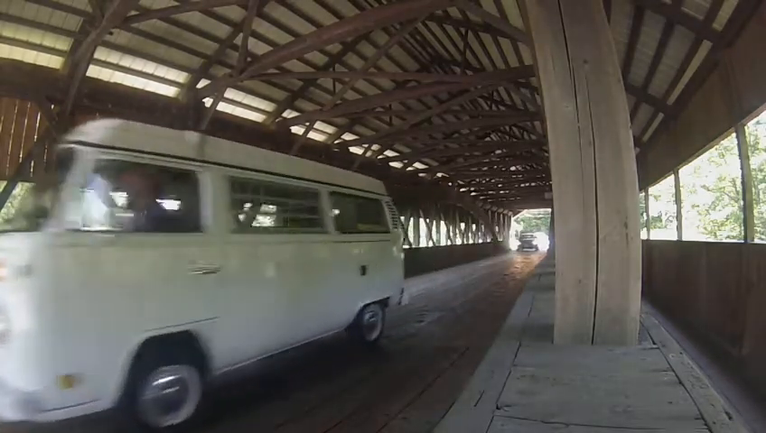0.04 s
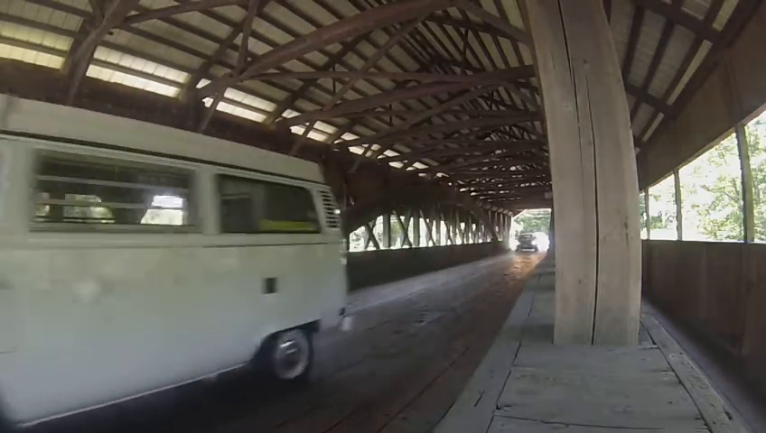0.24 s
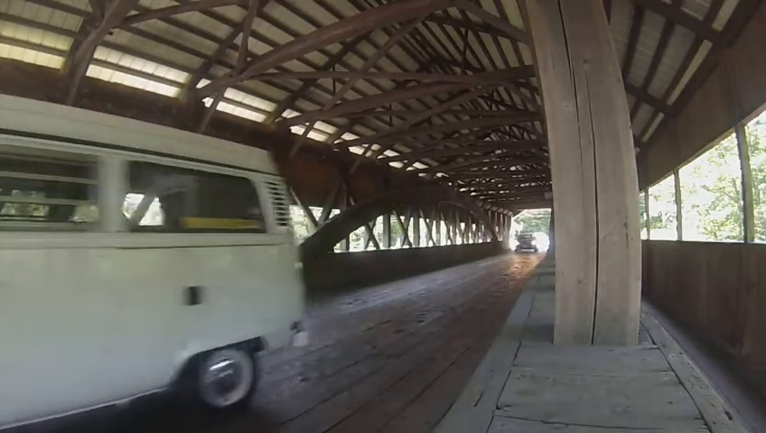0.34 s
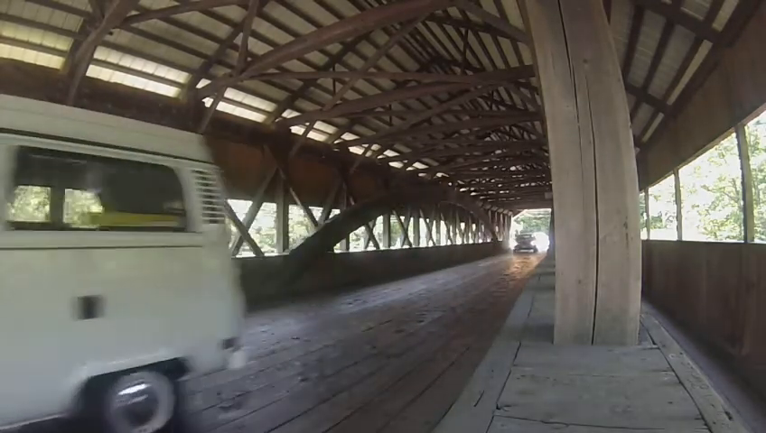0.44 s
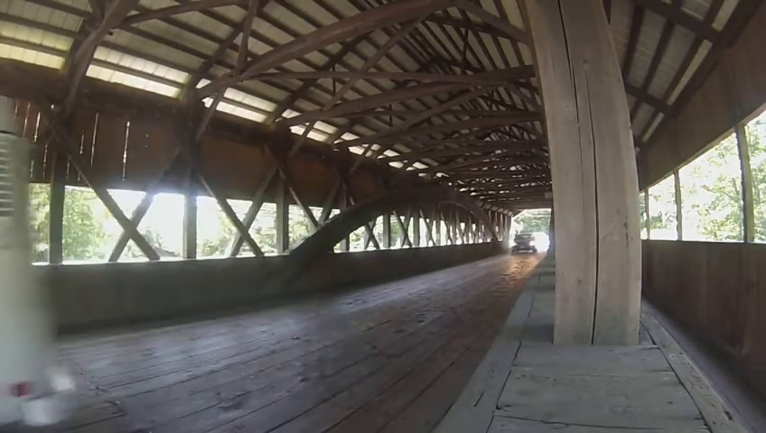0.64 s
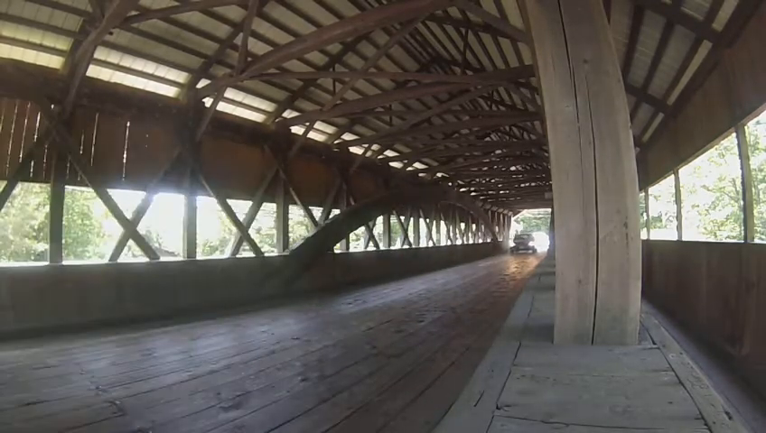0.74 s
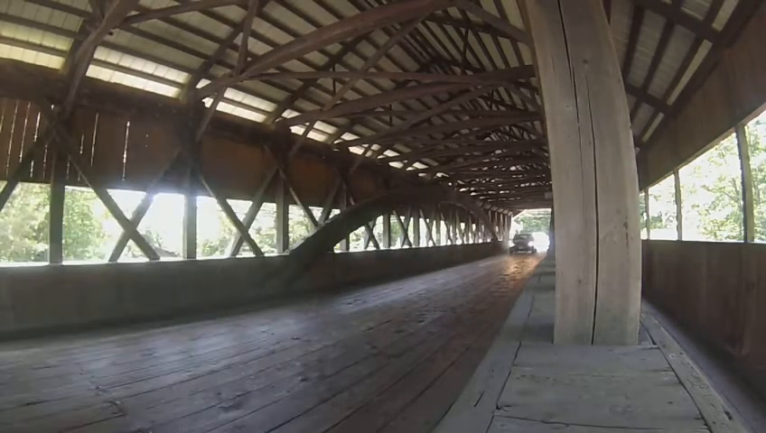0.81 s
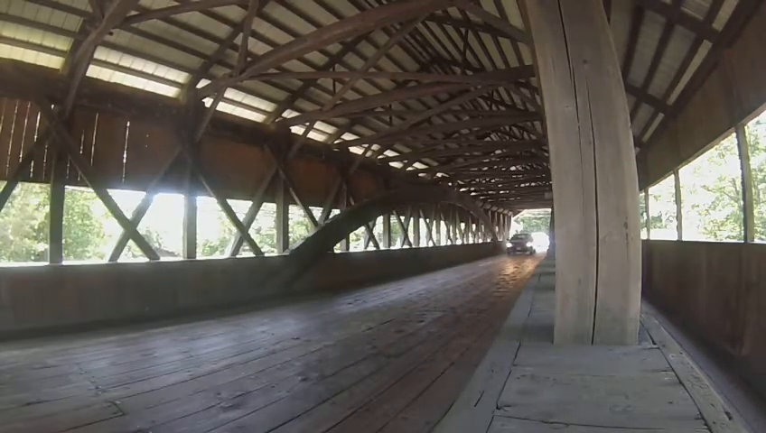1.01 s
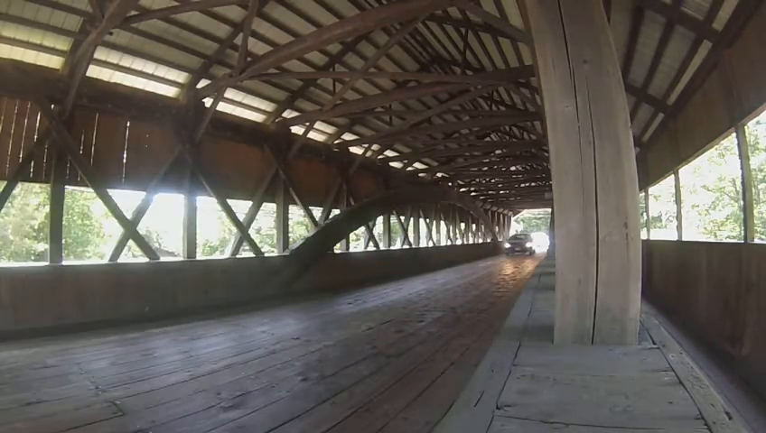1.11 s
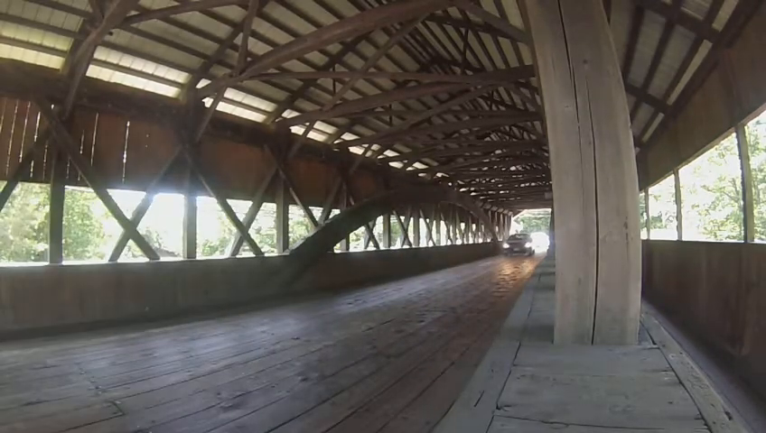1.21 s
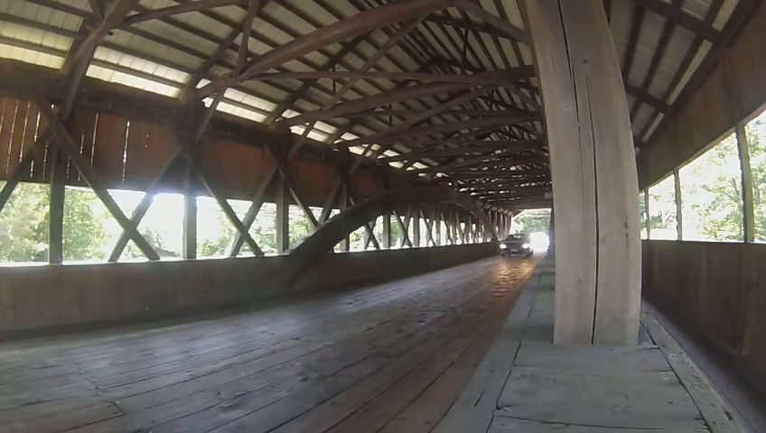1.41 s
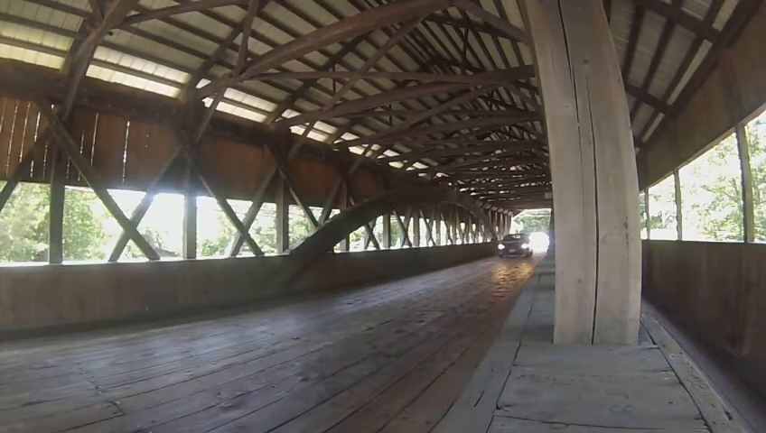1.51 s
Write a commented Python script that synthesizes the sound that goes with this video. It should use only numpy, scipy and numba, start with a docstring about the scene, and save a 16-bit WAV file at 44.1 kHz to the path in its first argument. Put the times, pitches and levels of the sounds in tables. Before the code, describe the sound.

A van rolls close by over the plank deck of a covered wooden bridge, its low drone and rumble building from the start. At about 0.5 seconds a wheel hits a loose plank with a low thump and a quick rattle of dry clacks. A second follows at about 0.9 seconds, the drone deepening with each. After 1.1 seconds the rumble eases, with a faint steady hiss throughout.

```python
"""A van on a covered wooden bridge

Heard from the walkway, rolling tyres force the plank deck into a drone and a rumble. Each of two axles
jolts the span and tips a loose plank, which rebounds with thuds and dry clacks while the drone deepens.
Tread noise swells and fades with distance, and a steady hiss ducks under automatic gain control."""
import sys
import numpy as np
from scipy import signal
from scipy.fft import rfft, irfft
from scipy.io import wavfile
from scipy.ndimage import uniform_filter1d
from numba import njit

SR = 44100
rng = np.random.default_rng(int(sys.argv[2]) if len(sys.argv) > 2 else 0)


def wrap_up_sound(samples):
    """Save the sound to the file named by the first command line argument, as 16-bit audio."""
    columns = np.atleast_2d(samples).T
    # keep every value between -1 and 1, then stretch to whole-number steps
    tamed = np.clip(columns, -1, 1)
    steps = np.round(tamed * 32767).astype(np.int16)
    wavfile.write(sys.argv[1], SR, steps)


N = 68355

# Impacts of the loose plank. Each row: start in seconds, thud in dB, clack in dB, contact cutoff in Hz.
PLANK_KNOCKS = [(0.4829, -34.5, 0, 1550), (0.4876, -8.5, -24, 2520), (0.4917, -36, -2.5, 5120),
                (0.495, -23, -21.5, 8000), (0.5051, -6.5, -4, 9000), (0.5100, 2.5, -25, 2980),
                (0.5182, -12.5, -3, 3020), (0.5369, -2.5, -2.5, 3220), (0.5537, -23, -34, 2030),
                (0.8468, -7, -3, 1600), (0.8557, -6, -4.5, 3900), (0.8596, -49, -10, 8100),
                (0.868, -12.5, -5.5, 4900), (0.8740, 2, -19.5, 3000), (0.8820, -46, -3.5, 2980),
                (0.9006, -9.5, -5.5, 3040), (0.9150, -6.5, -19, 2480), (0.9367, -33.5, -22, 3950),
                (0.942, -19.5, -18.5, 3080), (0.9563, -13, -40, 1500), (0.9613, -46, -20, 2470),
                (0.984, -31, -32, 1520)]
# Axles reaching the plank. Each row: start in seconds, jolt of the span in dB, tyre slap in dB.
AXLE_ARRIVALS = [(0.4840, -7.5, -10), (0.8470, -5.5, -4)]

# Modes of vibration. Each row: frequency in Hz, relative level in dB, 60 dB decay time in seconds.
PLANK_LOW_MODES = [(142.2, -20, 0.9), (189.4, -6, .15), (207.7, -6.5, 0.14), (272, -26.5, 0.14),
                   (297, -33.5, 0.32), (346, -34, 0.1), (417, -35.5, 0.21), (464.7, -23.5, 0.22),
                   (514, -33.5, .13), (526, -34.5, 0.059), (642, -32, 0.13)]
CLACK_RING_MODES = [(1204, -26, 0.084), (1377, -41, 0.17), (1562, -32, .18), (1726, -27.5, 0.085),
                    (1920, -35, 0.072), (2010, -32, .14), (2200, -49, 0.18), (4170, -47, .1)]  # the brief, high, rattling ring after each knock
CONTACT_MODES = [(1480, -9, .011), (1900, -10, .01), (2170, -3, .011)]  # heavily damped: a dry crack
TYRE_SLAP_MODES = [(280.6, 3, 0.081), (339.5, -7, 0.11)]

# The deck's response to the tyres. Each row: time in seconds, deep drone frequency in Hz,
# deep drone level in dB, upper drone level in dB, rumble level in dB.
DECK_RESPONSE = [(0, 78.1, -50.5, -28.5, -34.5), (0.121, 84.45, -31, -39.5, -38),
                 (0.241, 86.8, -29.5, -27.5, -27.5), (0.281, 86.1, -22, -29.5, -28.5),
                 (.36, 85.6, -17, -33.5, -23.5), (.40, 81.2, -32, -22.5, -31.5),
                 (.47, 70.5, -32.5, -28.5, -25), (.52, 68.5, -14, -11, -18),
                 (0.621, 67.96, -23, -29.5, -24), (0.758, 80, -25.5, -26.5, -30),
                 (.83, 74.63, -36.5, -31, -31.5), (0.892, 68.4, -14, -10.5, -32),
                 (.96, 67.2, -18, -17.5, -18.5), (1.05, 76.34, -21.5, -27.5, -28),
                 (1.148, 83.8, -24.5, -38, -45.5), (1.222, 86.75, -33, -39.5, -40.5),
                 (1.44, 87.5, -31, -35.5, -38), (1.55, 88, -34.5, -37, -39.5)]
# Course of a thin, high sizzle. Each row: time in seconds, level in dB.
SIZZLE_ENVELOPE = [(0, -63.5), (.55, -63.5), (.68, -61.5), (1.051, -60), (1.2, -65.5), (1.55, -63)]

# Spectra of the noises. Each row: frequency in Hz, relative level in dB.
RATTLE_SPECTRUM = [(300, 7.5), (600, 1), (950, -8), (1300, 5.5), (2200, 5), (2500, -5), (2800, -14),
                   (4000, -11.5), (4400, -20.5), (6000, -22), (8000, -49.5), (15000, -67)]
TIMBER_SPECTRUM = [(50, -60.5), (100, 4.5), (140, -22), (230, 0.5), (320, -5.5), (450, -14.5), (700, -28),
                   (1100, -39.5), (4000, -79)]
RUMBLE_SPECTRUM = [(20, -38.5), (34, -14.5), (45, -9), (68, 4), (90, -29), (115, 4.5), (143, -1.5),
                   (190, 4), (230, -6), (268, 0), (295, -8), (330, -8), (385, -28), (425, -27.5),
                   (455, -11.5), (490, -25), (700, -36), (1500, -30), (4000, -74.5)]
TREAD_SPECTRUM = [(300, -6), (700, 14.5), (1500, 2.5), (2000, -8), (3500, -2.5), (7000, -7), (9500, -22),
                  (13000, -20.5), (16000, -40)]
AIR_SPECTRUM = [(25, 20.5), (200, 8), (400, -0.5), (750, -2), (1050, -4.5), (1400, 6.5), (1650, 4),
                (1950, -7), (2480, 1.5), (2850, -14), (3800, -9.5), (5000, -16.5), (6500, -18.5),
                (8000, -20.5), (9300, -28), (12000, -27.5), (14500, -42), (16000, -25.5)]
SIZZLE_SPECTRUM = [(3000, -33.5), (5900, -1.5), (6450, 2.5), (6950, -30.5), (7500, -11.5), (8050, -7.5),
                   (8700, -26), (15000, -54.5)]

TIME = np.arange(N) / SR


def loose_plank():
    """Impact excitation: plank and timber thud; the clack that follows is brighter for a sharp contact."""
    starts, thud_db = np.array(PLANK_KNOCKS).T[:2]
    thud = soft_contact(ring(PLANK_LOW_MODES) * rise(0.00067), cutoff_hz=820)
    thuds = strike(starts, thud_db, thud)
    timber_energy = strike(starts, 2 * thud_db, decay(t60=0.19) ** 2)  # diffuse sound adds in energy
    timber = undb(-15) * colour(noise() * np.sqrt(timber_energy), TIMBER_SPECTRUM)
    clack = soft_contact(ring(CONTACT_MODES + CLACK_RING_MODES) * rise(0.00097), cutoff_hz=2220)
    rattle = undb(-17) * colour(noise(), RATTLE_SPECTRUM)
    burst = rise(0.0005) * decay(t60=0.075)
    clacks = np.zeros(N)
    for start, _, db, contact_hz in PLANK_KNOCKS:
        impact = strike([start], [db], clack) + rattle * strike([start], [db], burst)
        clacks += soft_contact(impact, contact_hz)
    return radiate(thuds + timber + clacks)


def axle_jolts():
    """Transient response: each axle jolts a low mode of the span as its tyre slaps the plank's edge."""
    starts, jolt_db, slap_db = np.array(AXLE_ARRIVALS).T
    span_hz, span_t60 = 84, 0.073
    jolts = strike(starts, jolt_db, ring([(span_hz, 0, span_t60)]))
    slaps = strike(starts, slap_db, ring(TYRE_SLAP_MODES) * rise(0.011))
    return radiate(soft_contact(jolts + slaps, cutoff_hz=583))


def deck():
    """Forced vibration: tyres drive two drones and a rumble; the deep drone sags as the axles pass."""
    times, *columns = np.array(DECK_RESPONSE).T
    deep_hz, deep_db, upper_db, rumble_db = (np.interp(TIME, times, column) for column in columns)
    deep = undb(deep_db) * drone(deep_hz, drift_rate_hz=6.8, waver_rate_hz=25.32)
    upper = undb(upper_db) * drone(159.74, drift_rate_hz=25.42, waver_rate_hz=33.89)
    return deep + upper + undb(rumble_db) * colour(noise(), RUMBLE_SPECTRUM)


def drone(hz, drift_rate_hz, waver_rate_hz):
    """Driven resonance: a deck mode kept sounding by the tyres, unsteady in pitch and strength."""
    drift_share, waver_db = 0.0205, 1.1
    cycles = np.cumsum(hz * (1 + drift_share * wander(drift_rate_hz))) / SR
    return np.sqrt(2) * np.sin(2 * np.pi * cycles) * undb(waver_db * wander(waver_rate_hz))


def tread_hiss():
    """Spherical spreading: the pressure of the tyre hiss falls inversely with the van's distance."""
    speed_m_s, nearest_s, nearest_m = 6.8, 0.47, 2.3
    distance_m = np.hypot(speed_m_s * (TIME - nearest_s), nearest_m)
    return undb(-50) * nearest_m / distance_m * colour(noise(), TREAD_SPECTRUM)


def air():
    """Ambient noise: open air and far tyres hiss steadily; a thin sizzle comes up behind the van."""
    sizzle_db = np.interp(TIME, *np.array(SIZZLE_ENVELOPE).T) + 2.7 * wander(rate_hz=30)
    hiss = undb(-42) * colour(noise(), AIR_SPECTRUM)
    return hiss + undb(sizzle_db) * colour(noise(), SIZZLE_SPECTRUM)


def ring(modes):
    """Free vibration: a struck body sounds as a sum of damped sines."""
    return sum(undb(db) * decay(t60) * np.sin(2 * np.pi * hz * TIME) for hz, db, t60 in modes)


def strike(starts, levels_db, response):
    """Superposition: each blow adds a delayed, scaled copy of the response."""
    out = np.zeros(N)
    for start, db in zip(starts, levels_db):
        i = int(start * SR)
        out[i:] += undb(db) * response[:N - i]
    return out


def soft_contact(x, cutoff_hz):
    """Contact compliance: a soft blow carries little treble."""
    return signal.sosfilt(signal.butter(4, cutoff_hz, fs=SR, output="sos"), x)


def radiate(x, cutoff_hz=52):
    """Radiation efficiency: the boards give off little of their lowest bass."""
    return signal.sosfilt(signal.butter(6, cutoff_hz, "high", fs=SR, output="sos"), x)


def colour(x, spectrum):
    """Minimum-phase filtering: shapes the spectrum, while white noise keeps its power."""
    size = 2 * N
    hz, db = np.array(spectrum).T
    bin_hz = np.maximum(np.arange(N + 1) * SR / size, 1)
    gain = undb(np.interp(np.log(bin_hz), np.log(hz), db))
    cepstrum = irfft(np.log(gain / np.sqrt(np.mean(gain ** 2))))
    cepstrum[1:N] *= 2  # folding onto positive time makes the filter causal
    cepstrum[N + 1:] = 0
    return irfft(rfft(x, size) * np.exp(rfft(cepstrum)))[:N]


def noise():
    """Gaussian white noise of unit variance."""
    return rng.standard_normal(N)


def wander(rate_hz):
    """Smooth random modulation of unit variance."""
    hold = int(SR / rate_hz)
    steps = np.repeat(rng.standard_normal(200), hold)[:N]
    smooth = uniform_filter1d(uniform_filter1d(steps, hold), hold)
    return (smooth - smooth.mean()) / smooth.std()


def rise(seconds):
    """Exponential attack with the given time constant."""
    return 1 - np.exp(-TIME / seconds)


def decay(t60):
    """Exponential damping by 60 dB in t60 seconds."""
    return np.exp(-np.minimum(np.log(1000) * TIME / t60, 60))


def undb(db):
    """Decibels to amplitude ratio."""
    return 10 ** (np.asarray(db) / 20)


def scene():
    """Superposition: the pressures of bridge, tyres and air add in one channel."""
    return (deck() + axle_jolts() + loose_plank() + tread_hiss() + air())[None]


@njit
def follow(x, attack_s, release_s):
    """Envelope detection: one time constant for a rising level, another for a falling one."""
    out, level = np.empty(len(x)), 0.
    for i in range(len(x)):
        level += (x[i] - level) / (SR * (attack_s if x[i] > level else release_s))
        out[i] = level
    return out


def record(dry):
    """Dynamic compression: gain ducks at loud thumps, peaks saturate softly and the top treble is cut."""
    threshold_db, look_ahead_s, knee, top_hz = -7, 0.003, 0.75, 15300
    level = follow(np.abs(dry[0]), attack_s=0.005, release_s=0.36)
    coming_level = np.interp(TIME + look_ahead_s, TIME, level)
    ducked = dry / np.maximum(coming_level / undb(threshold_db), 1)
    body = np.clip(ducked, -knee, knee)
    rounded = body + (1 - knee) * np.tanh((ducked - body) / (1 - knee))
    return signal.sosfilt(signal.ellip(8, .2, 70, top_hz, fs=SR, output="sos"), rounded)


dry = scene()
out = record(dry)
wrap_up_sound(out)
```